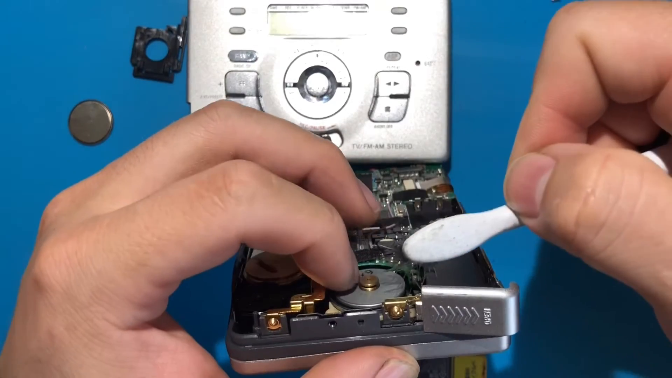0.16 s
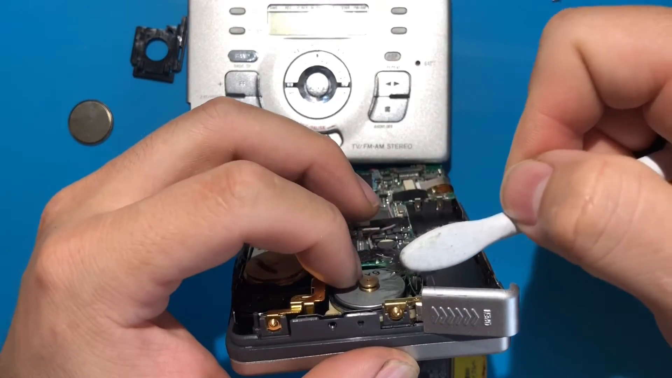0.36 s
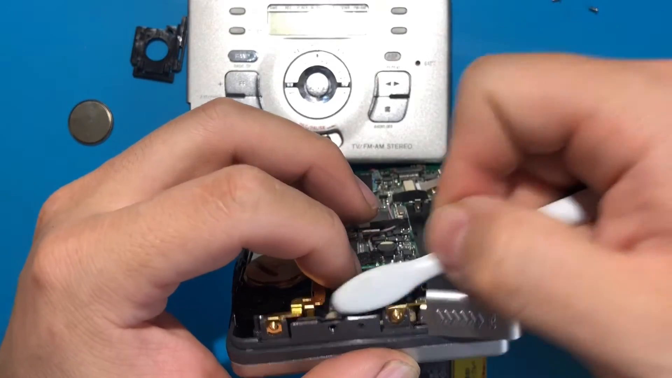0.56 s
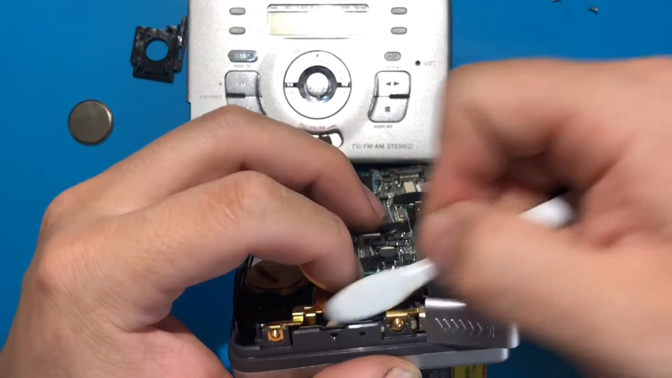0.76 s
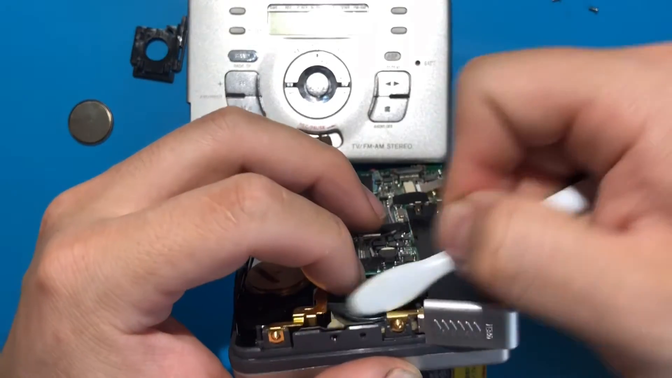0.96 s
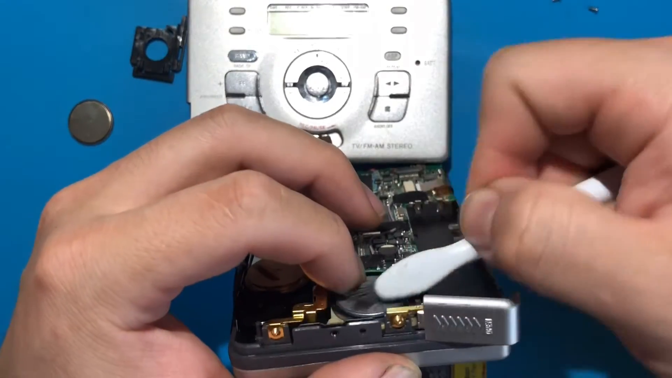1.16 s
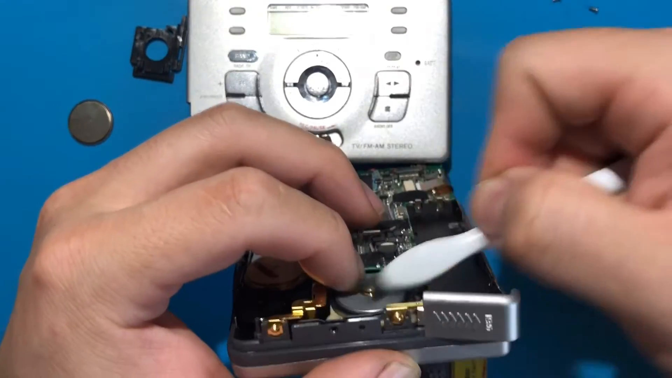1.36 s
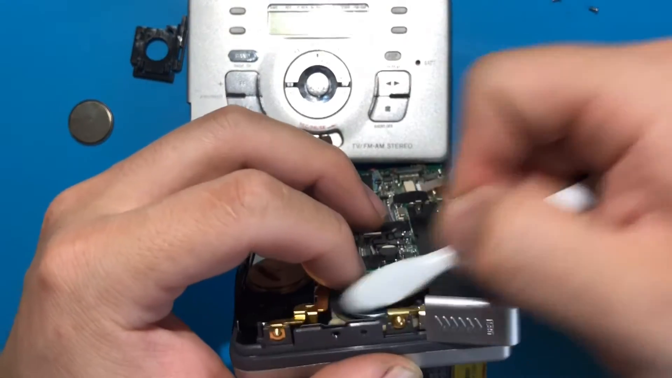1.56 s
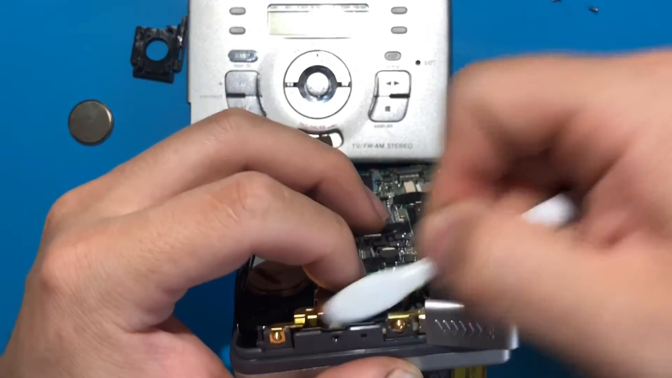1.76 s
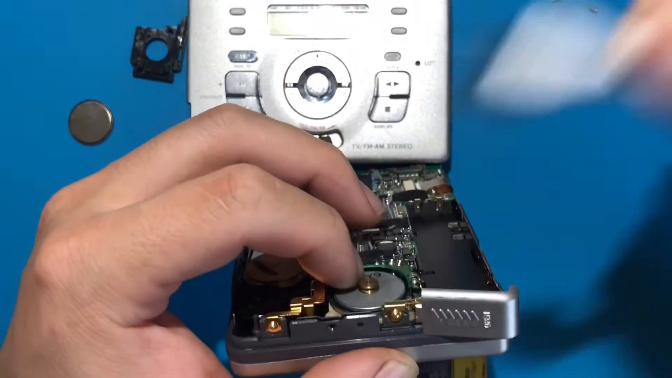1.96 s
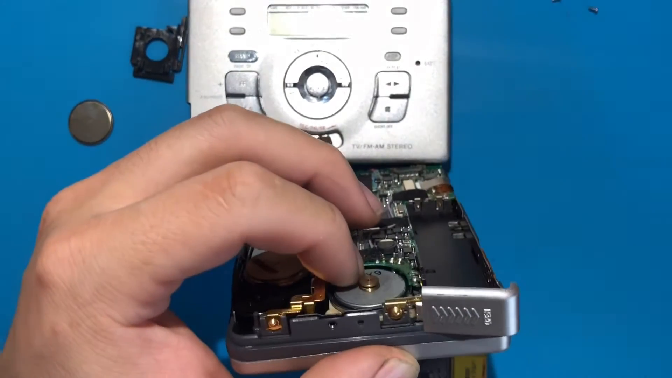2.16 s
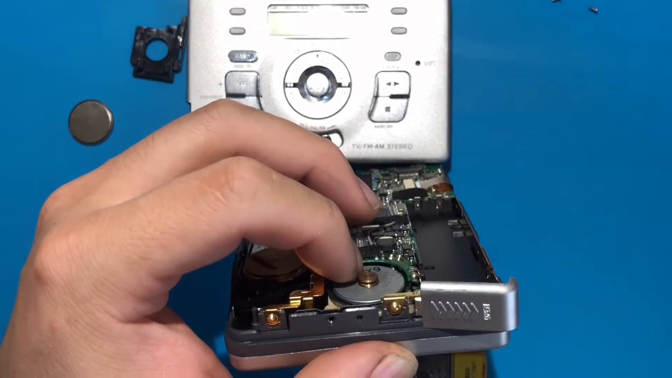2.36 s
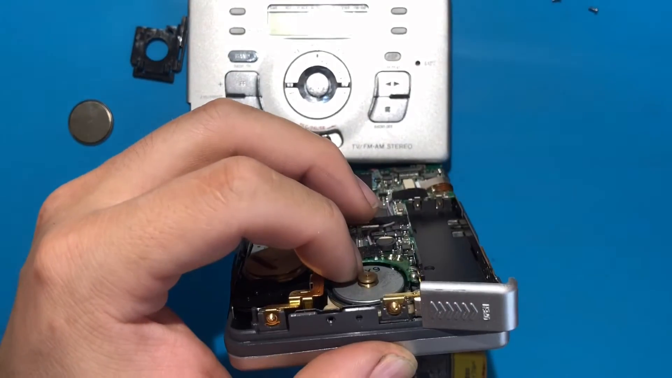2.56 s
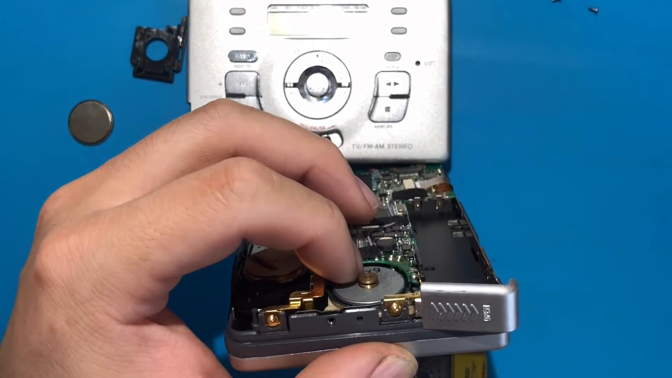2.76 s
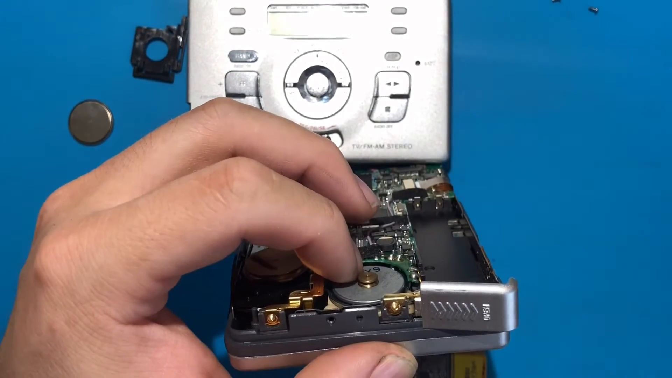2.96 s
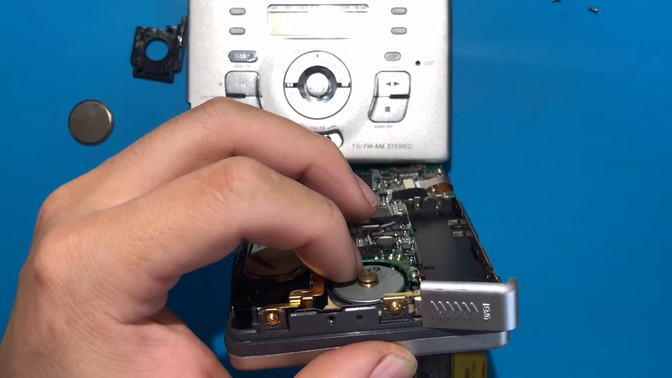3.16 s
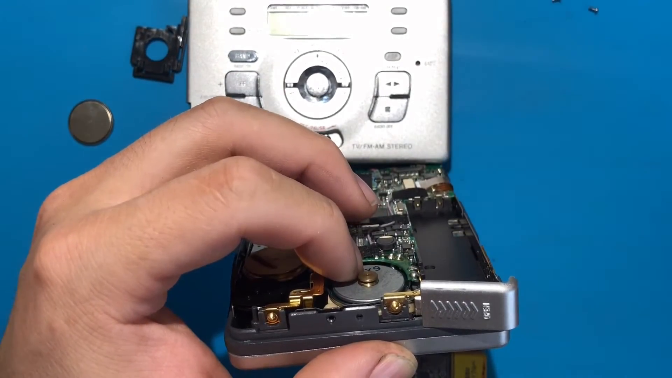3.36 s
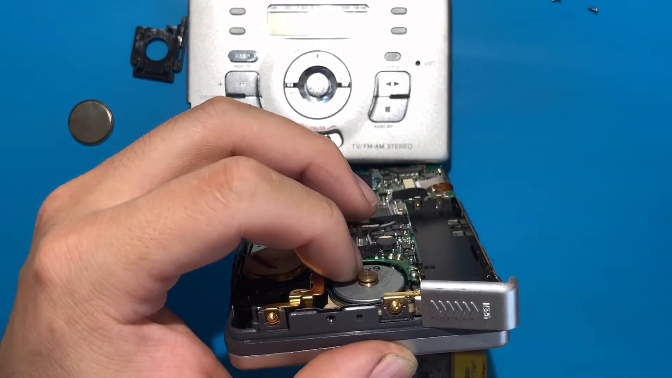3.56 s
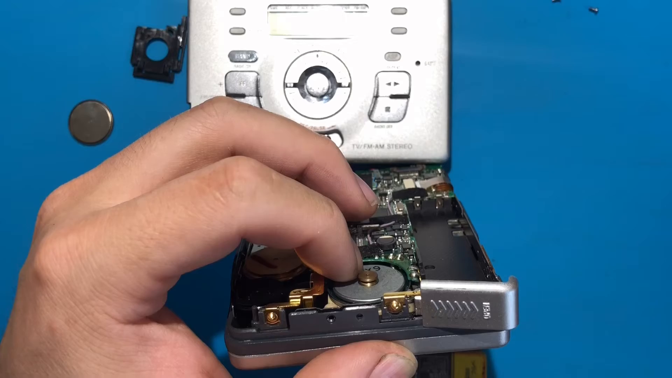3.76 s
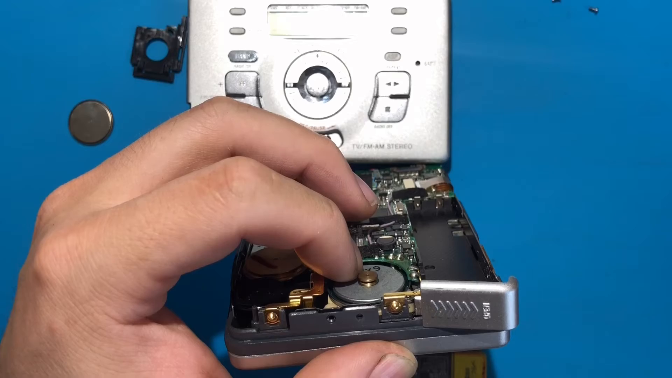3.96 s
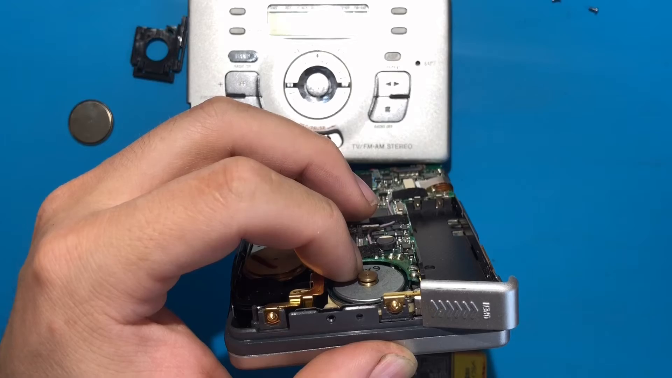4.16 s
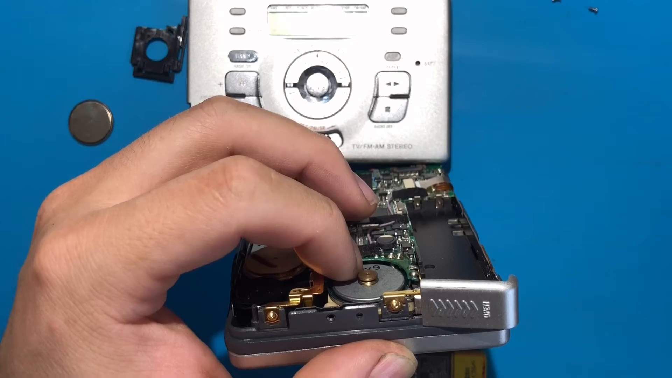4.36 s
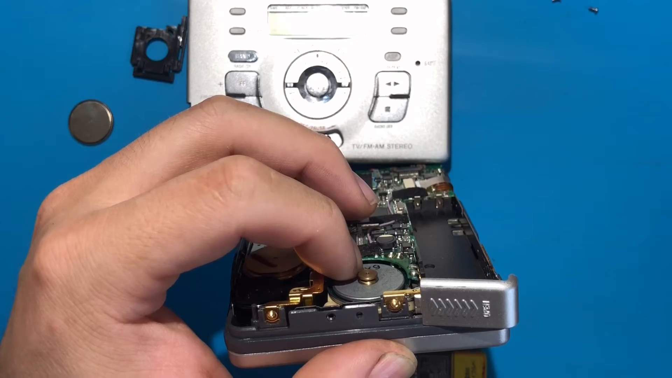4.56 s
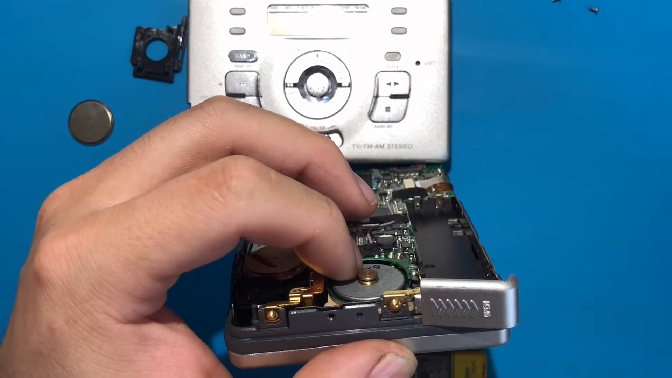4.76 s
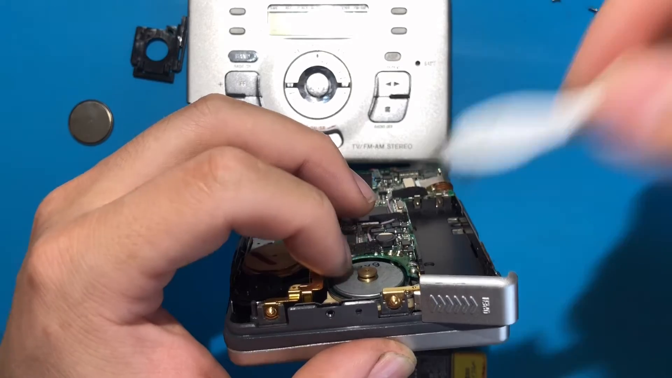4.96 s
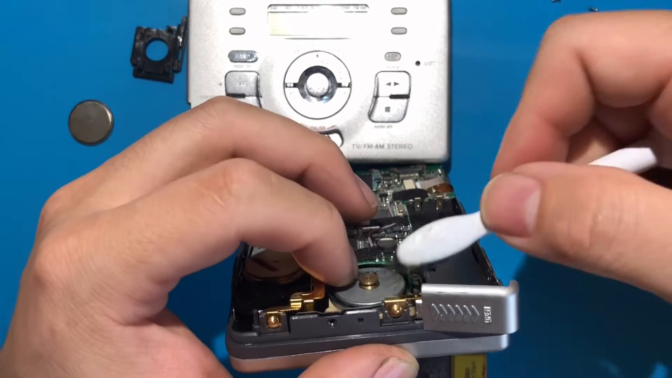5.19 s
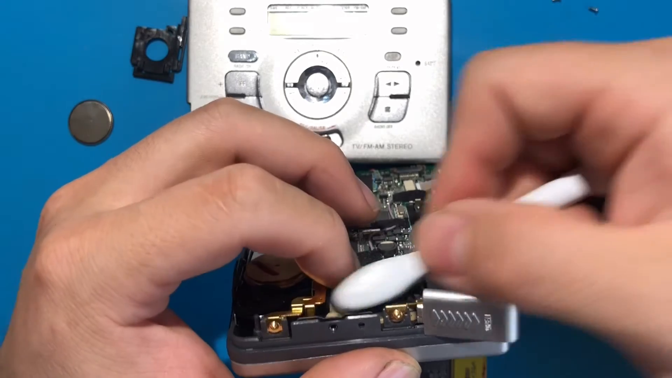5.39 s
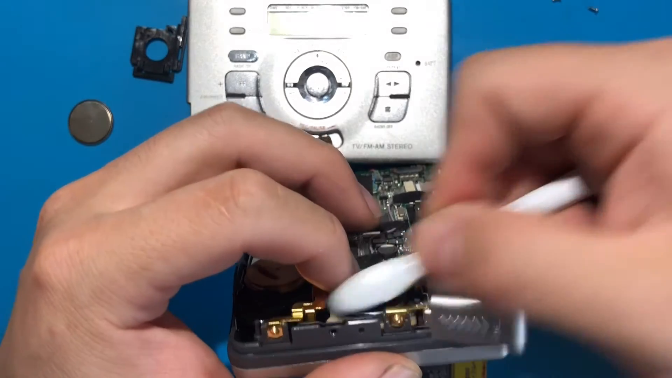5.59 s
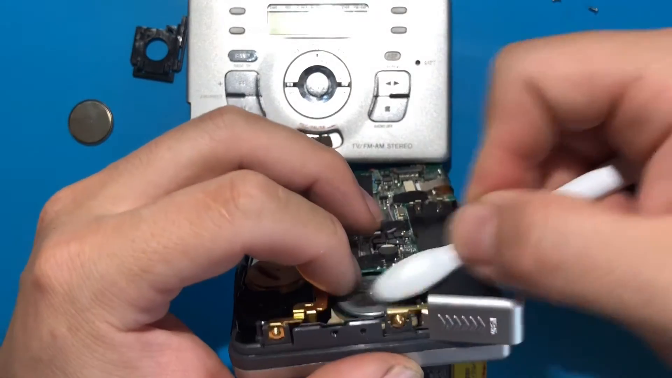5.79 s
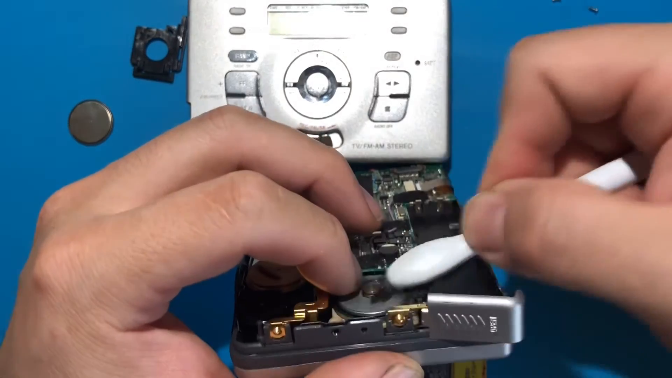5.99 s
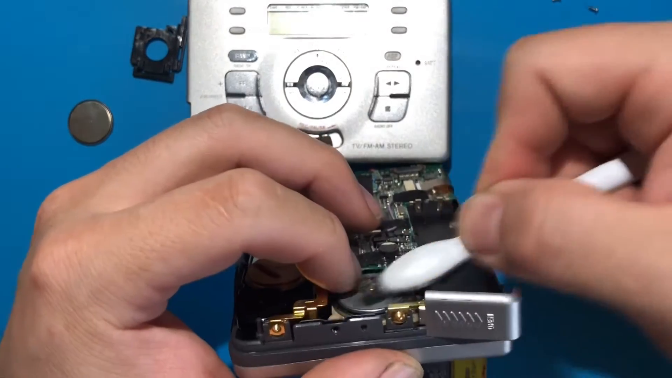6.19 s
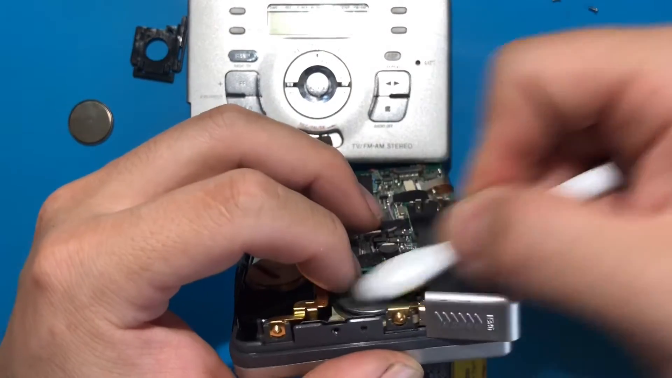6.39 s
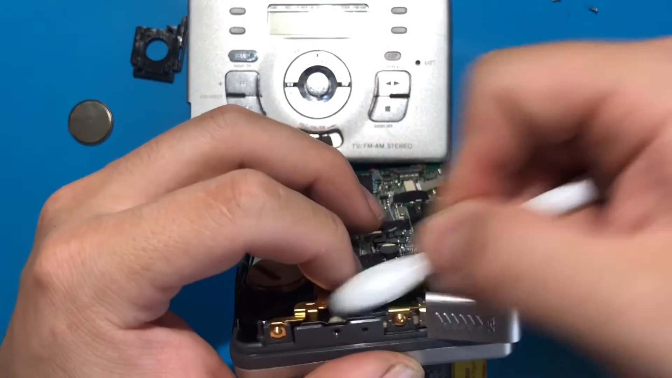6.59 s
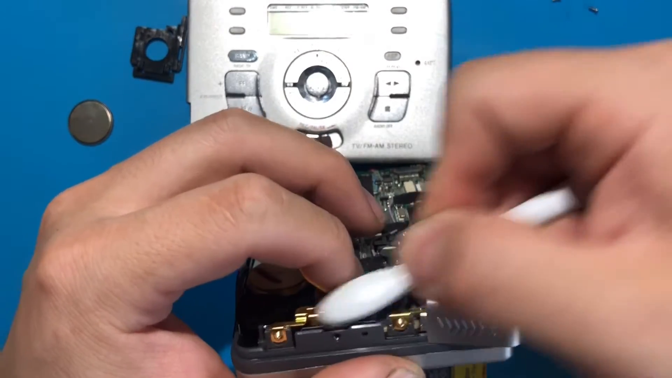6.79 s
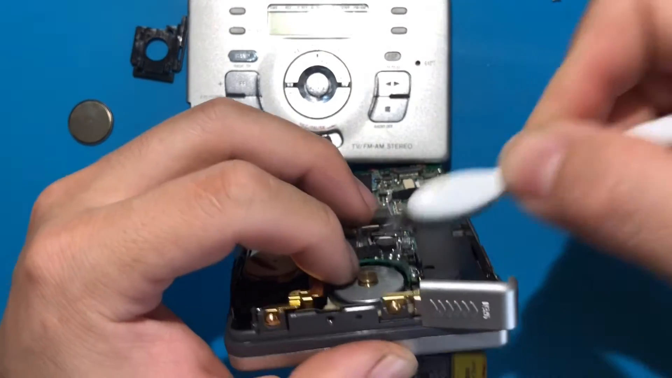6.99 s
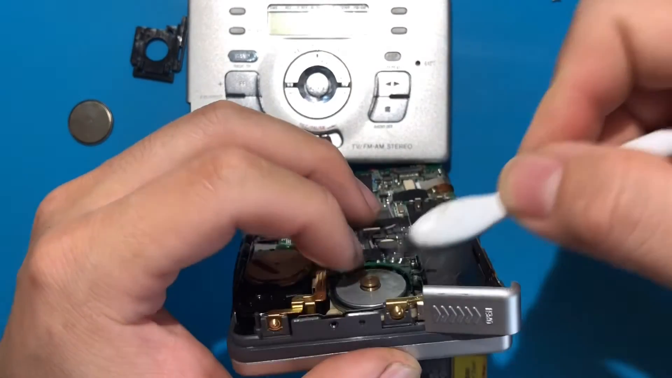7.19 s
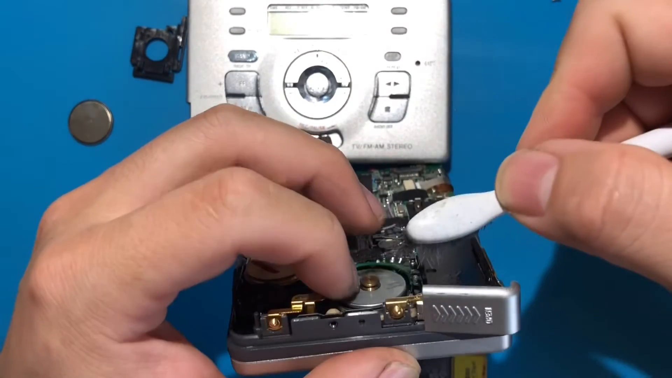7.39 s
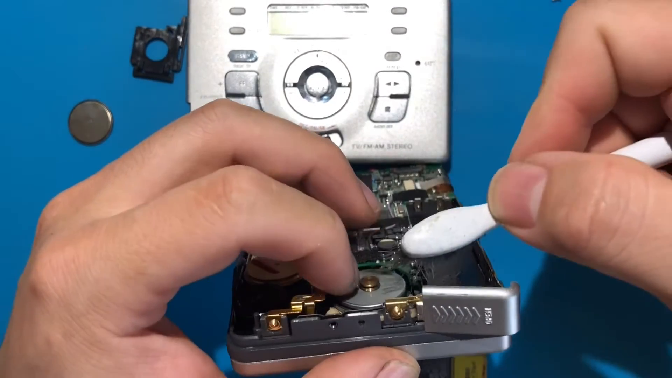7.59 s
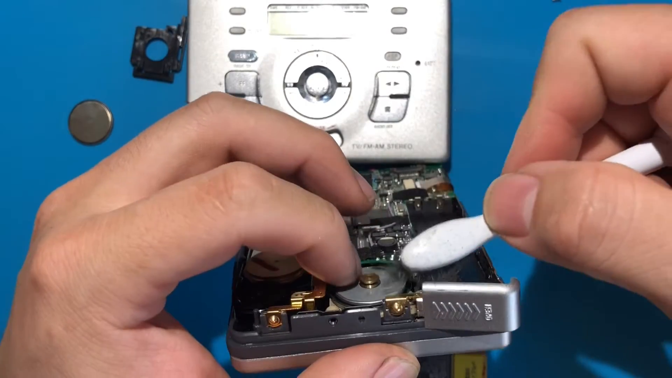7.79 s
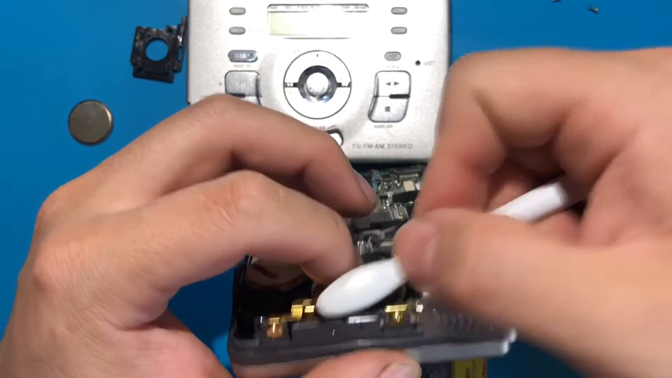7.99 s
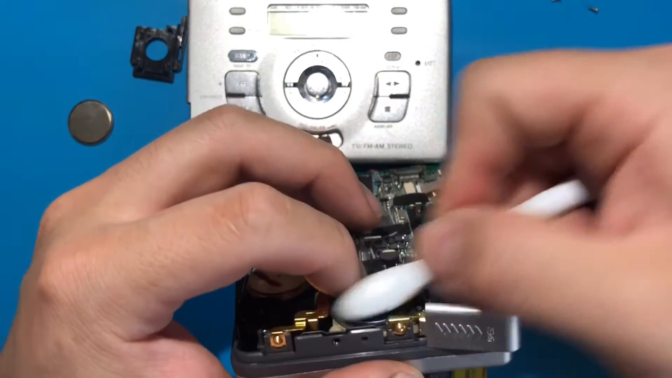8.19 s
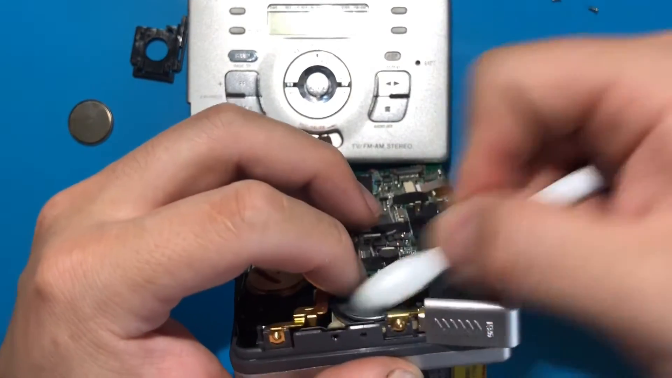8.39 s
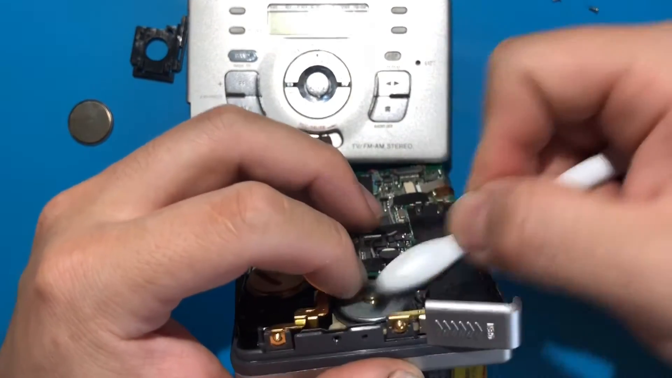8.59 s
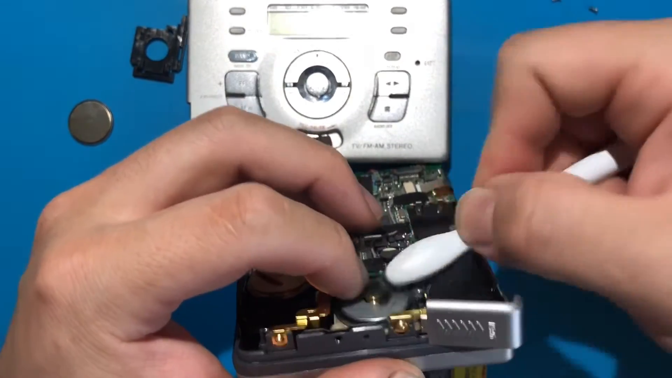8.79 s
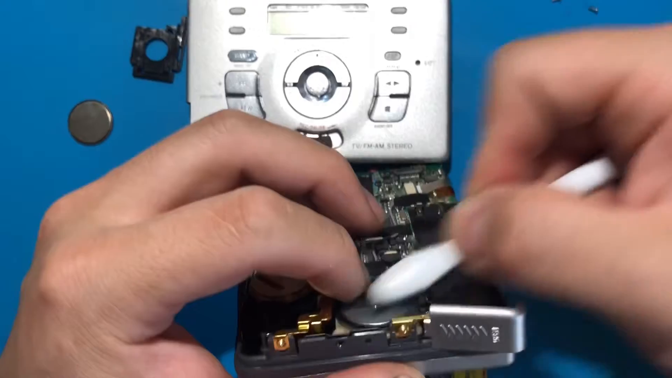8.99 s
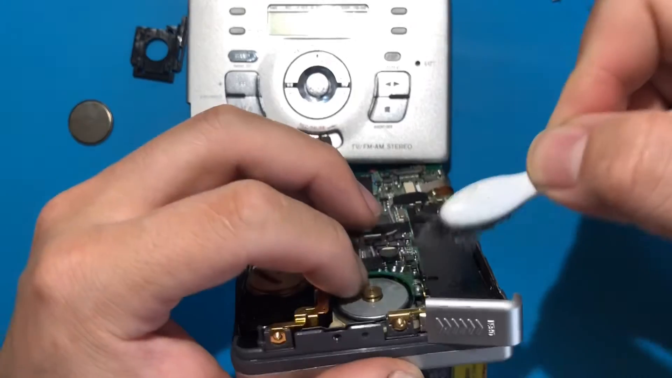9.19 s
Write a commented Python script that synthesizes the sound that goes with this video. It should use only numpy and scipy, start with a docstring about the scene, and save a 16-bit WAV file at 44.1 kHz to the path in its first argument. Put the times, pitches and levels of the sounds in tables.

```python
"""A toothbrush scrubs a small circuit board over a workbench, in three bursts of push and pull strokes.
Bristles hiss as filtered noise and grains; the same friction shakes resonances of casing and bench.
The head catches on parts: noise bursts ring the casing, snap the bristles and thud in the bench.
Between bursts the brush is laid aside, dipped and tapped twice: ringing modes, ticks and rubbing noise.
Behind it lie quiet air noise, fine crackle and a faint, even tick."""
import sys
import numpy as np
from scipy import signal
from scipy.fft import rfft, irfft
from scipy.io import wavfile
from scipy.ndimage import uniform_filter1d

SR = 44100
rng = np.random.default_rng(int(sys.argv[2]) if len(sys.argv) > 2 else 0)


def bounce(signal):
    """Save signal as a 16-bit WAV file at the path given by the first command-line argument."""
    frames = np.transpose(np.atleast_2d(signal))
    limited = np.clip(frames, -1, 1)
    pcm = np.round(limited * 32767).astype(np.int16)
    wavfile.write(sys.argv[1], SR, pcm)


N = 407484  # length in samples


def undb(db):
    """Decibels to gain."""
    return 10 ** (np.asarray(db) / 20)


def unit(x):
    """Scale to rms 1."""
    return x / np.sqrt(np.mean(x ** 2))


def peak_unit(x):
    """Scale to peak 1."""
    return x / np.abs(x).max()


def colour(x, points):
    """Shape the spectrum by (f/Hz, level/dB) points joined on a log frequency axis."""
    hz, db = np.transpose(points)
    f = np.arange(len(x) // 2 + 1) * SR / len(x) + 1  # 1 Hz up, to avoid log of 0
    gain = undb(np.interp(np.log(f), np.log(hz), db))
    return irfft(rfft(x) * gain, len(x))


def ring(x, modes):
    """Drive parallel resonances (f/Hz, width/Hz, level/dB), alternate in sign."""
    out = 0
    for k, (hz, width, db) in enumerate(modes):
        b, a = signal.iirpeak(hz, hz / width, SR)
        out = out + (-1) ** k * undb(db) * signal.lfilter(b, a, x)
    return out


def walk(rate):
    """Wandering level: a new random target each 1 / rate s, slewed between; spread near 1."""
    hold = int(SR / rate)
    targets = rng.standard_normal(N // hold + 1)
    return 1.56 * uniform_filter1d(np.repeat(targets, hold), hold)[:N]


def grains(rate, spread_db, t60):
    """Random flicks of very uneven size, each a swell of noise through two decays of t60 s; rms 1."""
    size = undb(spread_db * np.minimum(rng.exponential(size=N), 4))
    flicks = (rng.random(N) < rate / SR) * size
    fall = [1, -undb(-60 / (t60 * SR))]
    swell = signal.lfilter([1], np.convolve(fall, fall), flicks)
    return unit(swell * rng.standard_normal(N))


def add(out, s, sound):
    """Mix a sound in at time s."""
    i = int(s * SR)
    out[i:i + len(sound)] += sound[:len(out) - i]


def burst(t60, hz, rise=0.0012, count=4096):
    """A noise burst, high-passed at hz, that rises quickly and decays; peak 1."""
    t = np.arange(count) / SR
    x = rng.standard_normal(count) * (1 - np.exp(-t / rise)) * undb(-60 * t / t60)
    return peak_unit(signal.sosfilt(signal.butter(2, hz, "high", fs=SR, output="sos"), x))


# brush strokes, in turn push and pull: [start t/s, length t/s, bristle level/dB before the scrub mix]
STROKES = [(0.545, 0.06, -52.5), (0.633, 0.089, -50), (0.744, 0.078, -50.5), (0.852, 0.089, -48.5),
           (0.976, 0.111, -52.5), (1.086, 0.11, -44.5), (1.208, 0.085, -48), (1.331, 0.081, -41),
           (1.439, 0.097, -45.5), (1.558, 0.097, -42.5), (1.673, 0.078, -46), (1.77, 0.11, -41.5),
           (5.347, 0.11, -57.5), (5.48, 0.075, -42.5), (5.59, 0.083, -45), (5.692, 0.095, -40),
           (5.825, 0.078, -42.5), (5.924, 0.097, -38.5), (6.043, 0.081, -42.5), (6.154, 0.089, -38.5),
           (6.269, 0.072, -40.5), (6.375, 0.093, -37.5), (6.493, 0.081, -39), (6.588, 0.11, -40.5),
           (6.719, 0.073, -40.5), (6.816, 0.14, -38.5), (7.958, 0.086, -53), (8.063, 0.089, -42.5),
           (8.185, 0.075, -42.5), (8.295, 0.087, -39.5), (8.406, 0.076, -42), (8.513, 0.091, -38.5),
           (8.633, 0.074, -40), (8.739, 0.083, -34.5), (8.847, 0.081, -42), (8.962, 0.12, -38.5)]
# bench drive through each of the three bursts, before the scrub mix: [t/s, level/dB]
THRUM = [
    [(0.55, -55), (1.05, -48), (1.4, -46.5), (1.49, -40.5), (1.6, -53.5), (1.7, -40.5), (1.83, -48.5)],
    [(5.4, -56.5), (5.64, -44), (6.1, -49), (6.32, -44), (6.56, -43.5), (6.66, -51.5), (6.76, -42),
     (6.9, -51.5)],
    [(8.0, -53), (8.3, -47.5), (8.58, -46.5), (8.67, -43.5), (8.8, -49.5), (9.05, -46)],
]
# (push, pull): place of the fastest moment 0-1; casing dB in a usual stroke; bench dB over THRUM
FASTEST, CASING_DB, BENCH_DB = (.68, 0.58), (-50, -50.5), (1.5, 0.)
USUAL_DB = -44  # bristle level of a usual stroke
CASING_FOLLOWS = 0.47  # casing dB per dB of bristle strength


def motion(edge_db, bend):
    """Gains of bristles, casing and bench: each stroke swells with brush speed and dies at the turn."""
    t, out = np.arange(N) / SR, np.zeros((3, N))
    thrum_s, thrum_db = np.concatenate(THRUM).T
    for k, (s, length, db) in enumerate(STROKES):
        way = k % 2
        mid = FASTEST[way]
        span = slice(int((s - .06) * SR), int((s + length + .06) * SR))
        # distance from the fastest moment: 0 there, 1 at either turn
        u = (t[span] - s) / length - mid
        u = np.where(u < 0, -u / mid, u / (1 - mid))
        casing_db = CASING_DB[way] + CASING_FOLLOWS * (db - USUAL_DB)
        bench_db = BENCH_DB[way] + np.interp(s + mid * length, thrum_s, thrum_db)
        out[:, span] += np.outer(undb([db, casing_db, bench_db]), undb(edge_db * u ** bend))
    return out


# colour of the bristle hiss: [f/Hz, relative level/dB per Hz]
BRISTLES = [(1500, -25), (3000, 8.5), (5000, -3), (7000, 2.5), (9000, 5.5), (11000, 7), (13000, 5),
            (15000, 12.5), (17000, 1)]
# resonances of the device casing: [f/Hz, width f/Hz, relative level/dB]
CASING = [(570, 26, 0.5), (840, 105, -5), (1105, 190, -0.5), (1544, 100, -5.5), (1966, 90, -0.5),
          (2247, 106, 1), (2560, 240, 0.5), (2997, 290, -2.5), (3737, 303, 1.5), (4770, 120, -12),
          (5450, 210, -2.5)]
# resonances of the workbench: [f/Hz, width f/Hz, relative level/dB]
BENCH = [(112.5, 4.95, 1), (158.4, 8.1, -4), (191.6, 9.6, -5.5), (275, 66.5, -6.5), (290.1, 66.4, -5.5),
         (367, 97, -17), (686, 410, -25)]


def scrub():
    """Bristle tips slip in a dense hiss with louder flicks; the same friction shakes casing and bench."""
    tips = motion(edge_db=-14.5, bend=2.87)[0]
    _, casing, bench = motion(edge_db=-6, bend=4.6)
    # single bristles slip; whole tufts let go together
    single = grains(500, spread_db=4., t60=.0025)
    whole = grains(200, spread_db=2.5, t60=.014)
    rub = .65 * rng.standard_normal(N) + .55 * single + .35 * whole
    hiss = unit(colour(rub, BRISTLES))
    # upper and lower parts of the hiss shift as the tufts bend
    bands = [(5400, 2600, 0), (8400, 2400, 0), (13400, 7100, 0.011)]
    tufts = sum(undb(3.7 * walk(40)) * ring(hiss, [band]) for band in bands)
    bristles = unit(hiss + .6 * tufts) * undb(1.5 * walk(70))
    # the place of contact moves, so each mode of the casing comes and goes over a broad scrape
    modes = 0
    for mode in CASING:
        own_rub = rub * rng.choice([-1, 1], N)  # random signs keep the modes independent
        modes = modes + undb(3.05 * walk(30)) * ring(own_rub, [mode])
    scrape = ring(rub, [(880, 6500, -3.0), (2930, 1330, 5), (5970, 1560, -1)])
    body = unit(unit(modes) + 0.65 * unit(scrape)) * undb(2. * walk(50))
    thrum = ring(bench * grains(50, spread_db=2.0, t60=0.037), BENCH)
    # the working arm sways the whole bench, over a faint constant floor
    arm = uniform_filter1d(bench, int(.3 * SR)) + undb(-81.5)
    sway = arm * unit(ring(rng.standard_normal(N), [(46, 12, 0), (75, 30, -7)]))
    return undb(3.5) * (tips * bristles + casing * body) + undb(31.5) * thrum + undb(-3.0) * sway


# brush head catching on parts: [t/s, peak level/dB, strongest ring f/Hz, bristle snap level/dB over peak]
CATCHES = [(0.537, -30, 2530, 1.5), (0.6056, -37, 1810, -2), (0.7587, -36, 5540, 2),
           (0.7989, -28.5, 3520, -12), (1.0229, -26.5, 3680, 4), (1.045, -26.5, 1930, -4),
           (1.264, -26, 2480, 3.5), (1.286, -30, 3700, -16), (1.4627, -28, 3850, 7.5),
           (1.5563, -36, 2340, 8), (1.688, -25, 3830, 3), (1.913, -43.5, 1670, 0), (5.344, -50, 3500, 10),
           (5.4115, -35.5, 3800, 11.5), (5.5865, -47.5, 1960, 20), (5.6418, -23.5, 3620, 7),
           (5.708, -35, 3540, 0), (5.7203, -30.5, 3510, 7), (5.8485, -31, 3600, 7),
           (5.8755, -29, 2450, -19), (5.927, -40, 5400, 10), (5.956, -25.5, 2930, 7),
           (6.281, -48, 5980, 18), (6.301, -34, 2180, -5), (6.314, -20, 3730, -13),
           (6.3278, -19, 3460, -11), (6.4046, -35, 3670, -9.5), (6.5253, -33, 1240, -19),
           (6.5444, -18.5, 2570, -26), (6.569, -24, 1080, -12), (6.736, -29.5, 3540, 2),
           (6.76, -20.5, 2480, -11), (7.997, -36.5, 2290, 11), (8.0227, -33, 2240, -13),
           (8.2469, -31.5, 2710, 7), (8.2884, -33, 5420, 5), (8.4774, -24, 1080, -20),
           (8.6633, -22.5, 2330, -15), (8.7326, -36.5, 1045, -7), (8.87, -42.5, 1970, 19),
           (8.963, -30.5, 1200, -1.), (9.0985, -36, 2180, -21)]
THUD_DB = -13.5  # push into the bench over the peak of a catch, before the bench gain
# small random catches, one in each stroke: dB over the bristles, spread either way dB, snap dB over peak
SMALL_DB, SMALL_SPREAD_DB, SMALL_SNAP_DB = 3, 2, 12


def catches():
    """A short scrape into the casing modes near the ring, a snap of bristles and a thud in the bench."""
    out, push = np.zeros(N), np.zeros(N)
    small = []
    for s, length, db in STROKES:
        place, strength, pick = rng.random(3)
        small_db = db + SMALL_DB + SMALL_SPREAD_DB * (2 * strength - 1)
        hz = CASING[int(pick * len(CASING))][0]
        small.append((s + place * length, small_db, hz, SMALL_SNAP_DB))
    for s, db, hz, snap_db in list(CATCHES) + small:
        # modes lose 2.8 dB per octave away from the ring
        near = [(f, w, g - 2.8 * abs(np.log2(f / hz))) for f, w, g in CASING]
        knock = peak_unit(ring(burst(0.029, 270), near))
        snap = undb(snap_db) * burst(0.012, 3800)
        add(out, s, undb(db) * (knock + snap))
        add(push, s, undb(db + THUD_DB) * np.hanning(60))
    return out + undb(27) * ring(push, BENCH)


# taps on the bench and their bounces: [t/s, nominal level/dB of the body, tick level/dB over it]
TAPS = [(3.525, -11.5, -11.5), (3.572, -39, 0), (3.709, -29, -3), (4.114, -15.5, -14), (4.144, -40, 1.5)]
# modes of handle and bench when tapped: [f/Hz, relative level/dB, 60 dB decay t/s]
TAPPED = [(237, -19, 0.092), (310, 1, 0.026), (627, -20, 0.043), (845, 10, 0.01), (980, -1, 0.02),
          (1074, -12.5, 0.053), (1660, -6, 0.012), (3320, -17, 0.01), (4080, -33, .02),
          (7660, -9.5, 0.0062)]
LIGHT_CUT = 0.86  # dB of low modes lost per dB of extra tick: light taps hardly push the bench


def taps():
    """A light tick, then the modes of handle and bench pushed for a moment, with a woody tail."""
    out, t = np.zeros(N), np.arange(8192) / SR
    wood = [(170, 150, 4.5), (335, 116, 5.5), (740, 510, -9), (1210, 220, -2)]
    for s, db, tick_db in TAPS:
        modes = np.zeros(len(t))
        for hz, level_db, t60 in TAPPED:
            # high modes follow the tick, low modes weaken with it
            if hz > 2000:
                level_db = level_db + tick_db + 22.5
            elif hz < 900:
                level_db = level_db - LIGHT_CUT * (tick_db + 11.5)
            modes += undb(level_db - 60 * t / t60) * np.sin(2 * np.pi * hz * t)
        tail = peak_unit(ring(burst(0.18, 133, count=8192), wood))
        add(out, s - .001, undb(db + tick_db) * burst(0.011, 1060))
        add(out, s, undb(db) * (1 - np.exp(-t / 0.0014)) * (0.73 * modes + 0.14 * tail))
    return out


# small ticks of things handled nearby: [t/s, peak level/dB, ring f/Hz, snap level/dB over peak]
TICKS = [(2.052, -44.5, 760, -17), (2.124, -48.5, 830, -19), (2.229, -50, 610, -23), (2.264, -54, 611, -18),
         (2.353, -36.5, 620, -24), (2.483, -47.5, 1010, 10), (2.573, -39, 1120, -21), (2.621, -45, 945, 2),
         (2.683, -49, 1730, -14), (2.696, -48.5, 4150, -6), (2.734, -50, 4500, 9), (2.752, -63, 821, 11),
         (2.877, -68, 767, 18), (2.953, -49, 860, 7.5), (3.419, -60.5, 678, 13.5), (3.458, -62.5, 689, 15),
         (4.288, -57, 778, 7), (4.493, -51, 815, 2), (4.575, -62, 2500, 3), (4.659, -64, 807, 8),
         (4.757, -46.5, 1720, 3), (4.818, -51, 910, -16), (4.859, -43.5, 1500, -29),
         (5.194, -33, 4200, 4.5), (7.12, -44.5, 595, -0.5), (7.628, -53, 586, -9), (7.897, -56, 1070, 11),
         (7.945, -48.5, 3210, 14.5)]


def ticks():
    """Each tick rings one pitch with a dull body and an overtone, under a snap."""
    out = np.zeros(N)
    for s, db, hz, snap_db in TICKS:
        modes = [(.45 * hz, .4 * hz, -3), (hz, .2 * hz, 0), (1.9 * hz, .6 * hz, -8)]
        body = peak_unit(ring(ring(burst(0.018, 360), modes), modes))
        snap = undb(snap_db) * burst(0.014, 3600)
        add(out, s, undb(db) * (body + snap))
    return out


def friction(grit, s, length, modes):
    """A piece of grit noise passed twice through resonances, rms 1, then faded in and out."""
    part = grit[int(s * SR):int((s + length) * SR)]
    return signal.windows.tukey(len(part), .4) * unit(ring(ring(part, modes), modes))


# things slide and rub on the bench; the longest is a soft steady rush:
# [start t/s, length t/s, rms level/dB before fades, centre f/Hz, width f/Hz of each filter pass]
SLIDES = [(2.1, 0.34, -62, 250, 381), (1.987, 0.15, -67, 6000, 14000), (1.99, 2.64, -72, 747, 335),
          (2.178, 0.2, -64.5, 3800, 900), (2.206, 0.1, -51, 228, 305), (2.243, 0.089, -66, 7950, 12000),
          (2.335, 0.134, -48.5, 240, 298), (2.336, 0.074, -56.5, 1530, 1790),
          (2.47, 0.074, -56, 9000, 17000), (2.463, 0.094, -59, 540, 1200), (2.443, 0.395, -61.5, 147, 170),
          (2.633, 0.03, -61.5, 2500, 5000), (4.279, 0.039, -60, 370, 697), (3.8, 0.047, -58, 453.7, 900),
          (4.849, 0.028, -63, 2490, 3000), (7.9, .05, -63, 7000, 12000), (4.675, .053, -66.5, 500, 900),
          (4.696, 0.15, -73, 2400, 4000), (5.073, 0.14, -69, 140, 200), (6.998, 0.19, -66, 151, 280)]
# colour of the rattle after a tap: [f/Hz, width f/Hz, relative level/dB]
RATTLE = [(3450, 900, -6), (7900, 2500, 0), (13000, 6000, -4.5)]
RATTLE_S, RATTLE_DB = .065, -45  # length in s; dB relative to the tap


def bench_noises():
    """Grainy friction in one broad resonance for each slide; what was tapped rattles on briefly."""
    out = np.zeros(N)
    grit = .5 * rng.standard_normal(N) + 0.72 * grains(250, spread_db=3.5, t60=0.02)
    for s, length, db, hz, width in SLIDES:
        add(out, s, undb(db) * friction(grit, s, length, [(hz, width, 0)]))
    for s, db, _ in TAPS:
        add(out, s, undb(db + RATTLE_DB) * friction(grit, s, RATTLE_S, RATTLE))
    return out


# level of fine crackle, loudest while things are handled: [t/s, level/dB]
CRACKLE = [(0, -79), (1.9, -86), (2.3, -77), (2.8, -79), (3.12, -82), (3.18, -62.5), (3.36, -71),
           (3.42, -70), (3.8, -67.5), (4.2, -77), (4.65, -74), (4.9, -76), (9.3, -78)]


def crackle():
    """Sparse bright grains whose level follows the handling."""
    bright = [(3000, -10), (9000, 2), (15000, 1.5)]
    fine = unit(colour(grains(110, spread_db=3.5, t60=0.0054), bright))
    return fine * undb(np.interp(np.arange(N) / SR, *np.transpose(CRACKLE)))


# colour of the faint, even tick: [f/Hz, width f/Hz, relative level/dB]
EVEN = [(3000, 2400, -1), (9000, 2500, -6), (13800, 4000, 1)]
EVEN_START_S, EVEN_PERIOD_S, EVEN_DB = .0366, .10233, -52  # first time s, period s, peak dB


def even_tick():
    """Evenly spaced impulses ring three broad resonances."""
    beat = np.zeros(N)
    times = np.arange(EVEN_START_S, N / SR, EVEN_PERIOD_S)
    beat[(times * SR).astype(int)] = 1
    return undb(EVEN_DB) * peak_unit(ring(beat, EVEN))


# colour of the room air: [f/Hz, relative level/dB per Hz]
ROOM = [(15, -41.5), (25, -7.5), (53, -1), (80, -9.5), (108, -2.5), (180, -7.5), (249, -12.5), (734, -22),
        (818, -23.5), (4610, -33), (6050, -34.5), (8140, -34), (11900, -38.5), (14800, -28), (16000, -42)]
ROOM_DB = -61  # level around which the air wanders


def room_air():
    """Coloured noise, its level wandering a little."""
    return unit(colour(rng.standard_normal(N), ROOM)) * undb(ROOM_DB + 1.2 * walk(5))


def scene():
    """All sources; scrub, catches, taps and ticks get a short echo from bench and walls."""
    near = scrub() + catches() + taps() + ticks()
    echo = signal.fftconvolve(near, burst(0.18, 276, count=12000))[:N]
    # soft surfaces dull the echo
    echo = signal.lfilter([.35], [1, -.65], echo)
    background = bench_noises() + crackle() + even_tick() + room_air()
    return (near + undb(-28.0) * echo + background)[None]


def record(dry):
    """The phone cuts the deepest bass below 37 Hz and the top above 15750 Hz with steep filters."""
    x = signal.sosfilt(signal.cheby1(8, 1, 37, "high", fs=SR, output="sos"), dry)
    return signal.sosfilt(signal.ellip(10, .2, 80, 15750, fs=SR, output="sos"), x)


dry = scene()
out = record(dry)
bounce(out)
```